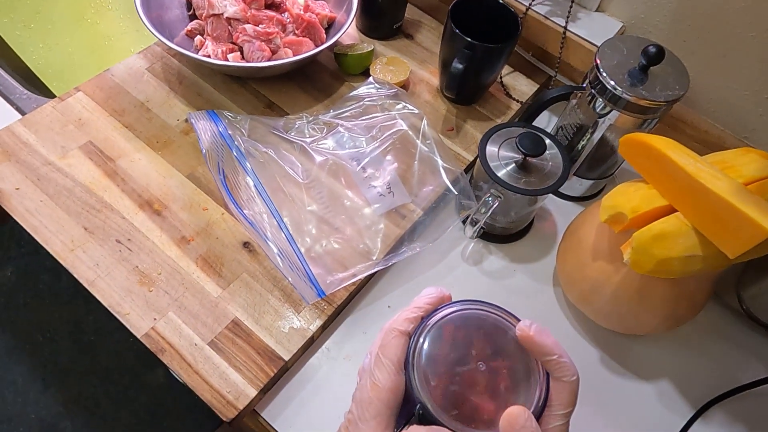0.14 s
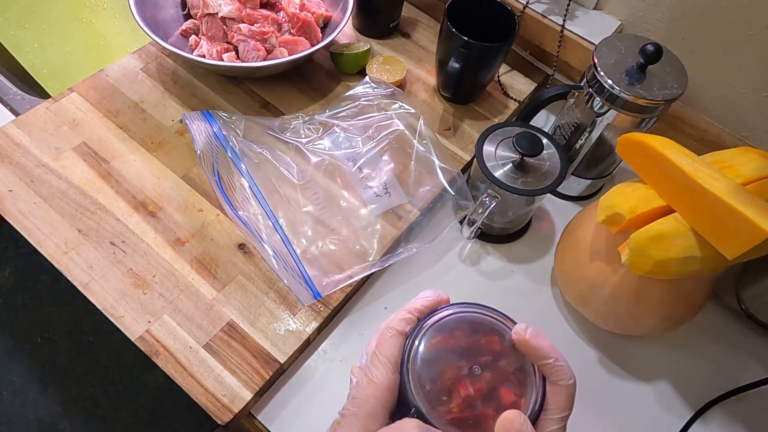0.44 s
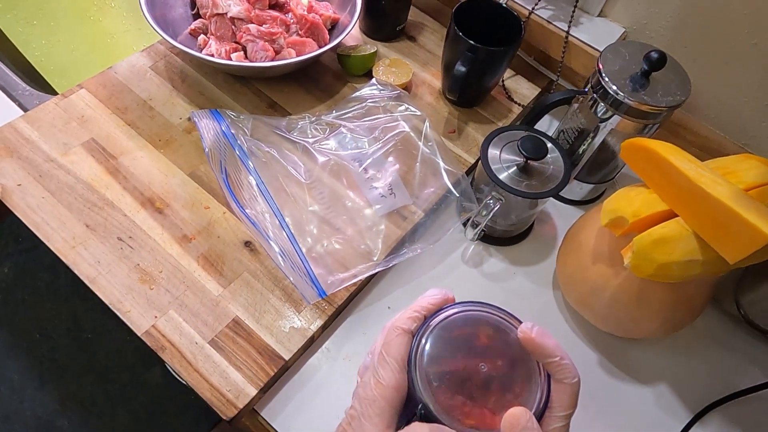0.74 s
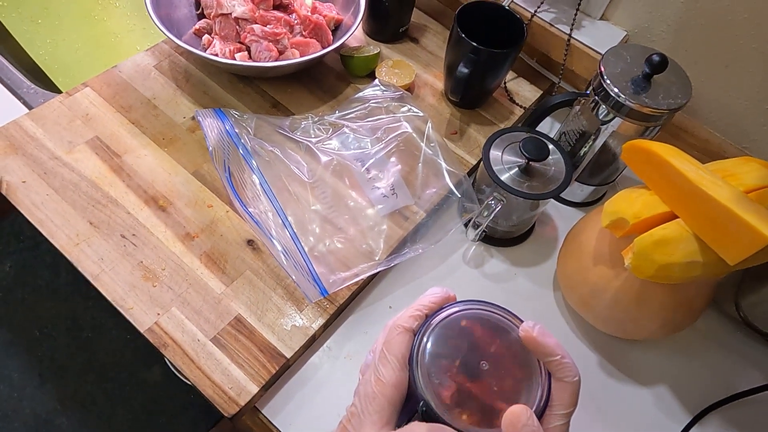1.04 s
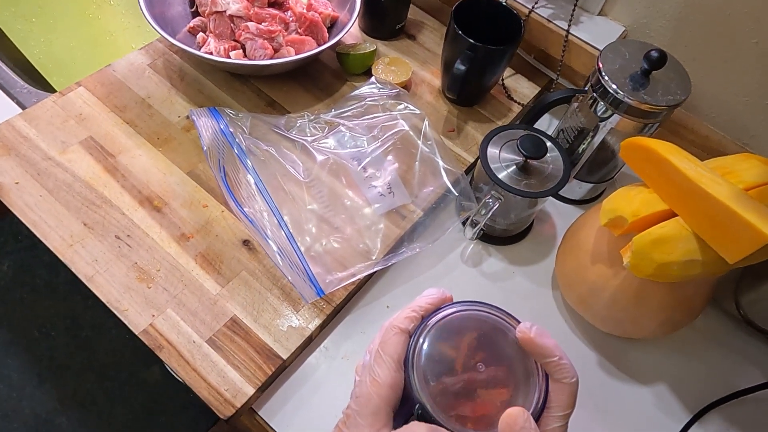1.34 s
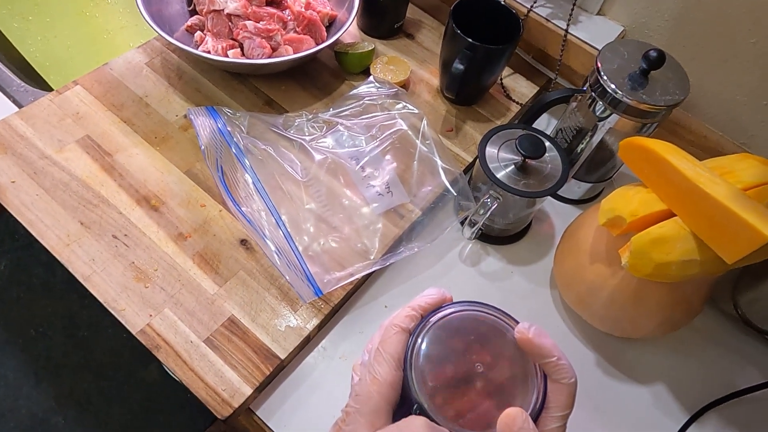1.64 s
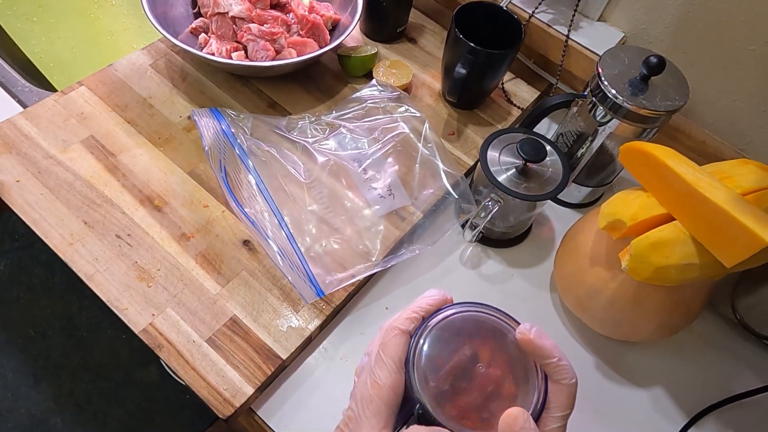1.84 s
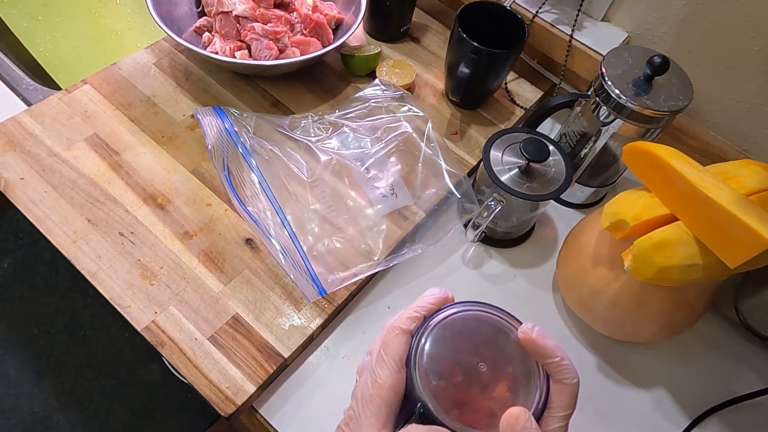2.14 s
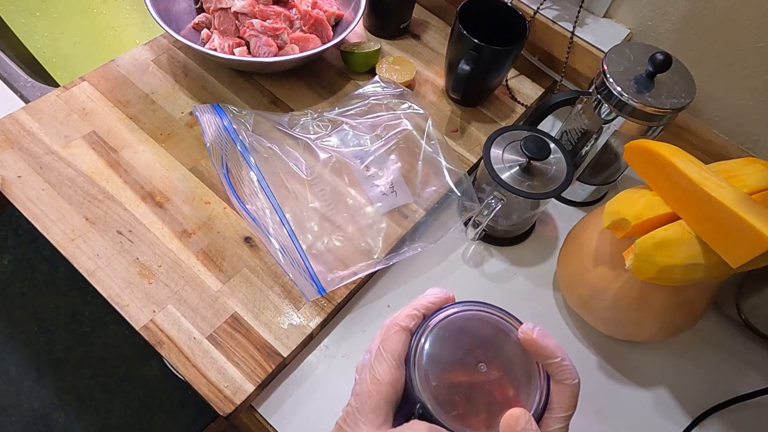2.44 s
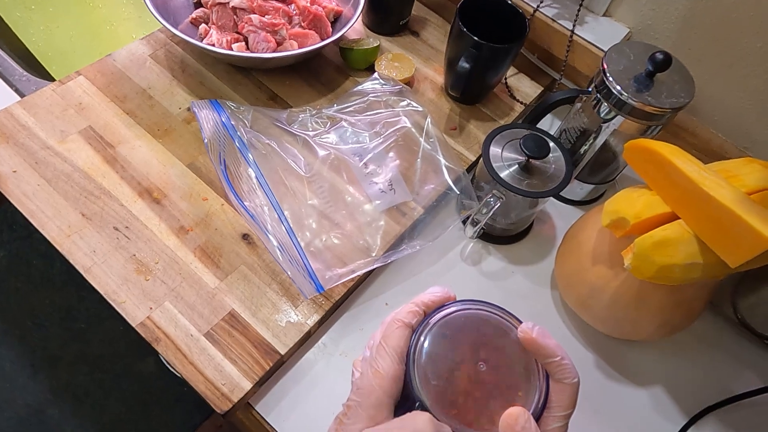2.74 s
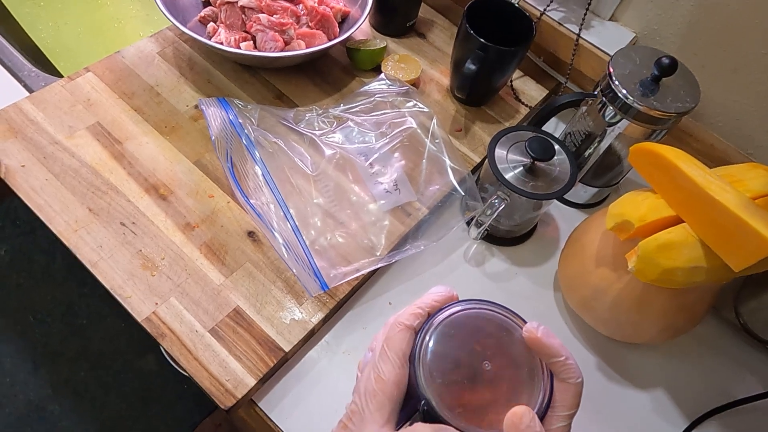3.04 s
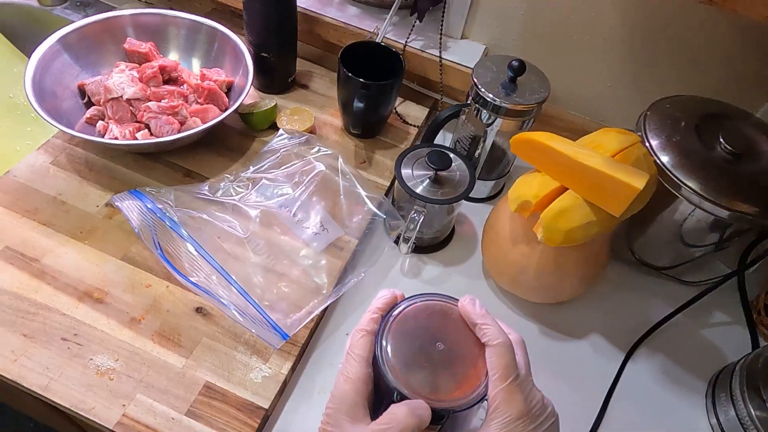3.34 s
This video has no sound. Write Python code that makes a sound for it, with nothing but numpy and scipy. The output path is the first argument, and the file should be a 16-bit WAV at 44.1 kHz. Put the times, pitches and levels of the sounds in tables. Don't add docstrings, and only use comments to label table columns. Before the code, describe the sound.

A small electric blade grinder, close in a quiet kitchen with short echo, is already winding down at 0 s. Full bursts start near 0.5, 1.6 and 2.7 s: each leaps up in about 0.3 s, whining and rattling dry chili pieces, then coasts down in pitch into sparse knocks. The third coast cuts off at 3.2 s; faint finger ticks, then a weaker burst begins at 3.35 s.

```python
import sys
import numpy as np
from scipy import signal
from scipy.fft import rfft, irfft
from scipy.io import wavfile
from scipy.ndimage import map_coordinates

SR = 44100
rng = np.random.default_rng(int(sys.argv[2]) if len(sys.argv) > 2 else 0)


def to_linear_factor(level_db):
    exponent = np.asarray(level_db, float) / 20
    return 10 ** exponent


def dump(signal):
    limited = np.clip(np.atleast_2d(signal).T, -1, 1)
    pcm = np.round(limited * 32767).astype(np.int16)
    wavfile.write(sys.argv[1], SR, pcm)


N = 154350

# start [s], held [s], level [dB], coast time factor, extra level at start [dB].
PRESSES = [
    (-.60, 0.32, -25, 1.01, 3),
    (.482, 0.28, -24, 1.01, -2),
    (1.582, 0.3, -24.5, 1.03, -2),
    (2.694, .31, -24.5, 1.02, 0.5),
    (3.349, 0.32, -28, 1.01, -6.5),
]
# frequency [Hz], width [Hz], level [dB].
CUP_MODES = [(349, 71, -12), (546, 82, -10), (921, 42, -1.5), (1052, 53, -10), (1258, 35, -5),
             (1492, 79, -6.5), (1700, 65, -3.5), (1860, 43.5, 3), (2066, 46, -2), (2168, 29, -7),
             (2346, 59, -6), (2480, 82, -10.5), (2750, 89, -9), (2936, 40, -9)]


def level(x, db):
    return x * to_linear_factor(db) / np.sqrt(np.mean(x ** 2))


def colour(x, table):
    hz, db = np.array(table).T
    grid_hz = np.arange(1025) * SR / 2048
    log_gain = np.interp(np.log(grid_hz + 1), np.log(hz), db) * np.log(10) / 20
    cepstrum = irfft(log_gain)
    cepstrum[1:1024] *= 2
    cepstrum[1025:] = 0
    impulse = irfft(np.exp(rfft(cepstrum)))[:1024]
    return signal.fftconvolve(x, impulse)[:N]


def ring(x, hz, width_hz):
    return signal.lfilter(*signal.iirpeak(hz, hz / max(width_hz, 5), fs=SR), x)


def walk(rate_hz):
    at = np.arange(0, N + 64, 64) * rate_hz / SR
    return map_coordinates(rng.standard_normal(400), [at]).repeat(64)[:N]


def opposed(x):
    return np.array([x, -x])


def room_tone():
    # frequency [Hz], density [dB per Hz].
    spectrum = [(100, -16), (200, -10.5), (375, 0.5), (620, -6), (900, -13.5), (1700, -9.5), (3200, -21),
                (9000, -42)]
    mid, side = (level(colour(rng.standard_normal(N), spectrum), -62) * to_linear_factor(2 * walk(14)) for _ in range(2))
    return mid + opposed(0.39 * side)


def ticks():
    # start [s], level [dB], frequency [Hz], t60 [s].
    small_ticks = [(.474, -57, 2970, .1), (1.576, -54, 4000, 0.11), (3.244, -52, 960, 0.089),
                   (2.542, -52, 6300, 0.022), (2.682, -63, 4200, .03), (3.229, -59, 6200, 0.033),
                   (3.231, -56, 4300, 0.038), (3.24, -51, 1700, 0.075), (3.243, -64, 2400, 0.046),
                   (3.294, -56, 6900, 0.014), (3.34, -46, 3500, .05), (2.605, -55, 380, 0.13),
                   (2.656, -50, 380, 0.07)]
    size = 3000
    out, s = np.zeros(N), np.arange(size) / SR
    for at_s, db, hz, t60_s in small_ticks:
        y = ring(ring(rng.standard_normal(size), hz, .12 * hz), hz, .4 * hz)
        start = int(at_s * SR)
        out[start:start + size] += level(y, db) * to_linear_factor(-60 * s / t60_s)
    return out


def knocks():
    # start [s], peak level [dB], favoured frequency [Hz], rattle length [s].
    strikes = [(0.094, -26, 1860, 0.0036), (0.476, -21, 1860, 0.011), (1.148, -16, 921, 0.0056),
               (1.213, -17.5, 4150, 0.0035), (1.249, -16, 1860, 0.0094), (1.304, -19, 1860, .004),
               (1.581, -16.5, 3820, 0.0048), (1.751, -8.5, 2750, 0.0056), (2.31, -23, 1860, 0.0044),
               (2.36, -32, 1860, 0.0053), (2.693, -10, 1860, 0.0094), (3.353, -19.5, 1860, 0.013)]
    size = 3000
    out, s = np.zeros(N + size), np.arange(size) / SR
    for at_s, db, hz, length_s in strikes:
        x = rng.standard_normal(size) * np.exp(-s / length_s * 1.53) * np.minimum(s / .0015, 1)
        y = 6.1 * ring(x, hz, 120) + 0.12 * ring(x, 1800, 2100)
        y = y + sum(to_linear_factor(mode_db) * ring(x, f, 2 * w) for f, w, mode_db in CUP_MODES)
        start = int(at_s * SR)
        out[start:start + size] += y * to_linear_factor(db - 6.5) / np.abs(y).max()
    return ring(out[:N], 2600, 5000) * 1.15


def motion():
    # time after press [s], shaft speed [Hz].
    spin_up = [(0, 40), (.03, 129.8), (.06, 190), (.1, 240.1), (.15, 256), (.2, 279), (.26, 291.1),
               (.305, 291)]
    # shaft speed [Hz], rattle level [dB].
    rattle_by_speed = [(0, -41), (18, -38), (38, -24), (52, -12), (74, -6), (135, -2.5), (185, -1.3),
                       (240, 0.5), (300, -0.25)]
    coast_s, drag_hz = 0.39, 40
    settle_db_per_s, start_s, grip_s = 122, 0.076, 0.0025
    top_hz = spin_up[-1][1]
    t = np.arange(N) / SR
    hz, db = np.zeros(N), np.full(N, -120.)
    for at_s, held_s, press_db, stretch, start_db in PRESSES:
        s = t - at_s
        held = s < held_s
        tau_s = coast_s * stretch
        up = np.interp(s * spin_up[-1][0] / held_s, *np.array(spin_up).T)
        coast = np.maximum((top_hz + drag_hz) * np.exp(-(s - held_s) / tau_s) - drag_hz, 0)
        speed = np.where(held, up, coast)
        rest_s = np.maximum(s - held_s - tau_s * np.log(1 + top_hz / drag_hz), 0)
        drive_hz = np.where(held, np.maximum(speed, 200), speed)
        now = np.interp(drive_hz, *np.array(rattle_by_speed).T) - settle_db_per_s * rest_s
        now = now + press_db - 25 * np.clip(1 - s / grip_s, 0, 1)
        now = now + start_db * np.exp(-np.maximum(s, 0) / start_s)
        hz, db = np.where(s > 0, speed, hz), np.where(s > 0, now, db)
    return hz, db


def motor(hz):
    # multiple of shaft speed, level at full speed [dB].
    orders = [(1, -37.5), (2, -52.5), (3, -51), (6, -51), (7, -48.5), (8, -41.5), (16, -45)]
    mount_hz, mount_width_hz = 293, 17
    turn = 2 * np.pi * np.cumsum(hz * (1 + 0.00587 * walk(60))) / SR
    tones = sum(to_linear_factor(db + 2.7 * walk(40)) * np.sin(k * turn + rng.random() * 2 * np.pi) for k, db in orders)
    tones = tones * np.sqrt(2) * (hz / 290)
    tones = tones * (1 - np.exp(-(hz / 90) ** 4))
    body = sum(to_linear_factor(db) * ring(ring(tones, f, w), f, 2 * w) for f, w, db in CUP_MODES if f > 2 * mount_hz)
    body = body * to_linear_factor(14 - 4 * (np.gradient(hz) < 0))
    mount = to_linear_factor(0.5) * ring(tones, mount_hz, mount_width_hz)
    cup_ring = 1.6 * ring(tones, 2335, 60)
    return 0.78 * tones + mount + body + cup_ring


def bank(hits, modes, flutter_db):
    out = np.zeros(N)
    for hz, width_hz, db in modes:
        y = level(ring(hits * rng.standard_normal(N), hz, width_hz), 0)
        out += to_linear_factor(db + flutter_db * walk(20)) * y * np.sqrt(width_hz)
    return out


def rattle(hz):
    # frequency [Hz], width [Hz], level [dB].
    lid_modes = [(3530, 47, -4.5), (4063, 120, 1.5), (4490, 99, -3), (5100, 140, -0.5), (6200, 66, -5.5),
                 (6780, 130, -5), (7500, 40, -6)]
    # frequency [Hz], density [dB per Hz].
    clatter_spectrum = [(110, -18), (170, -11), (700, -19), (950, -9.5), (1850, -6.5), (5200, -13),
                        (7200, -21), (14000, -70)]
    hits_per_turn, hits_per_s_at_rest, scatter_db = 16, 1100, 2
    sweep = 1 + .3 * np.cos(2 * 2 * np.pi * np.cumsum(hz) / SR)
    rate = (hits_per_s_at_rest + hits_per_turn * hz) * sweep
    force = to_linear_factor(scatter_db * np.minimum(rng.exponential(size=N), 4))
    hits = (rng.random(N) < rate / SR) * force / np.sqrt(rate)
    cup = level(bank(hits, CUP_MODES, 1.5), -2)
    lid = level(bank(hits, lid_modes, 1.63), -11.5)
    clatter = level(colour(hits * rng.standard_normal(N), clatter_spectrum), -7.5)
    air = level(colour(rng.standard_normal(N), clatter_spectrum), -7.5)
    return cup + lid + clatter + air


def ports(mid):
    # frequency [Hz], lead of the left port [rad].
    port_lead = [(150, 0.26), (500, -0.059), (1000, -0.34), (2700, -.8), (4500, -.5), (7000, -0.38),
                 (10000, -.2)]
    hz, rad = np.array(port_lead).T
    lead = np.interp(np.log(np.arange(N // 2 + 1) * SR / N + 1), np.log(hz), rad)
    return irfft(rfft(mid) * 1j * np.tan(np.clip(lead, -2, 2) / 2), N)


def grinder():
    # frequency [Hz], side minus mid [dB].
    side_spectrum = [(200, -34), (670, -14), (1220, -14), (2220, -7.5), (4060, -5.5), (7410, -6),
                     (12000, -2.5)]
    clump_db, clump_hz = 1.5, 107
    hz, db = motion()
    clump = .5 + clump_db * np.exp(-(hz / clump_hz) ** 2)
    strength = to_linear_factor(db + 1.45 * walk(14) + clump * walk(35.04))
    mid = rattle(hz) * strength + motor(hz) + knocks()
    mid = mid + .55 * ring(mid * (np.gradient(hz) < 0), 921, 55)
    side = colour(rattle(hz) * strength, side_spectrum) * to_linear_factor(-5.5)
    return mid + opposed(side + ports(mid))


def room_echo():
    t60_s, echo_db = 0.35, -15.5
    s = np.arange(SR // 2) / SR
    raw = rng.standard_normal((2, len(s))) * to_linear_factor(-60 * s / t60_s) * (s > .004)
    return signal.lfilter([.4], [1, -.6], raw) * to_linear_factor(echo_db) / np.sqrt(np.sum(raw ** 2) / 2)


def scene():
    cut_s, cut_fade_s = 3.201, .004
    t = np.arange(N) / SR
    dry_ports, echo = grinder(), room_echo()

    def wet(x):
        return x + signal.fftconvolve(x, echo, axes=1)[:, :N]

    before = wet(dry_ports * (t < cut_s)) * np.clip((cut_s - t) / cut_fade_s, 0, 1)
    after = wet(dry_ports * (t >= PRESSES[-1][0]))
    return room_tone() + ticks() + before + after


def band_limit(x):
    return signal.sosfilt(signal.butter(12, 14120, fs=SR, output="sos"), x)


def record(dry):
    # frequency [Hz], gain [dB].
    mic_response = [(9000, 0), (11500, -2), (13200, -8), (15000, -22)]
    low_cut = signal.butter(11, 154.4, "high", fs=SR, output="sos")
    x = signal.sosfilt(low_cut, dry) + to_linear_factor(-37) * dry
    mix = np.array([colour(side, mic_response) for side in x])
    return band_limit(mix)


dry = scene()
out = record(dry)
dump(out)
```